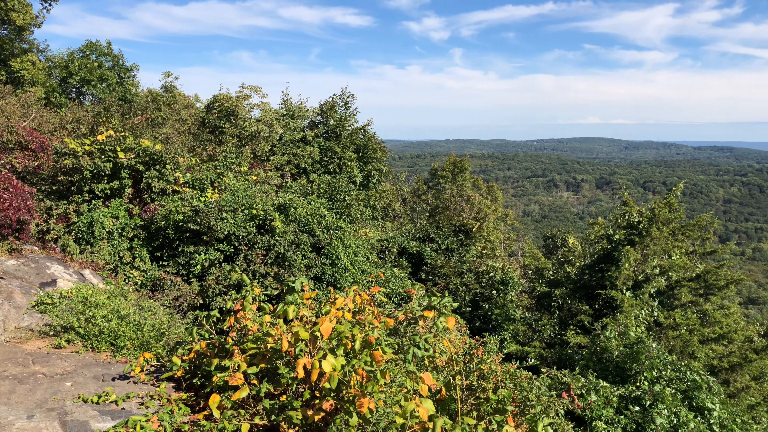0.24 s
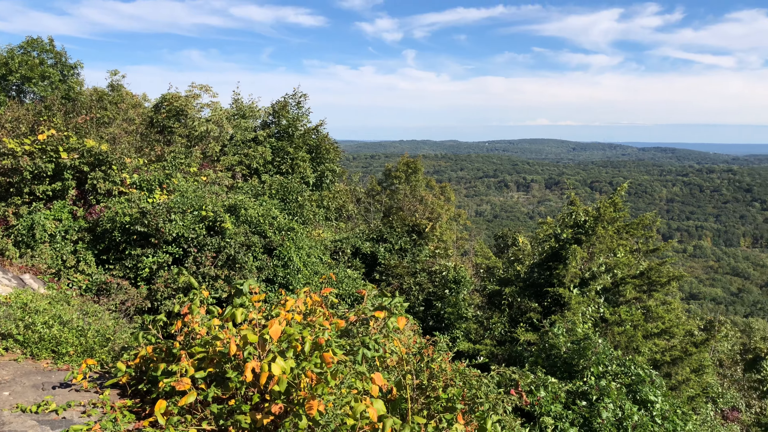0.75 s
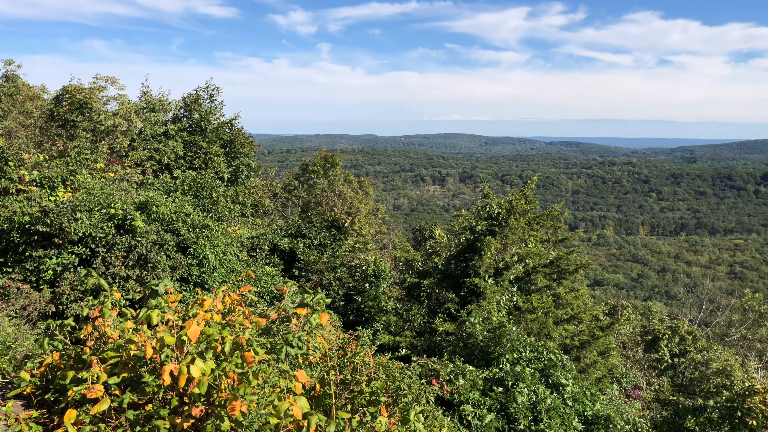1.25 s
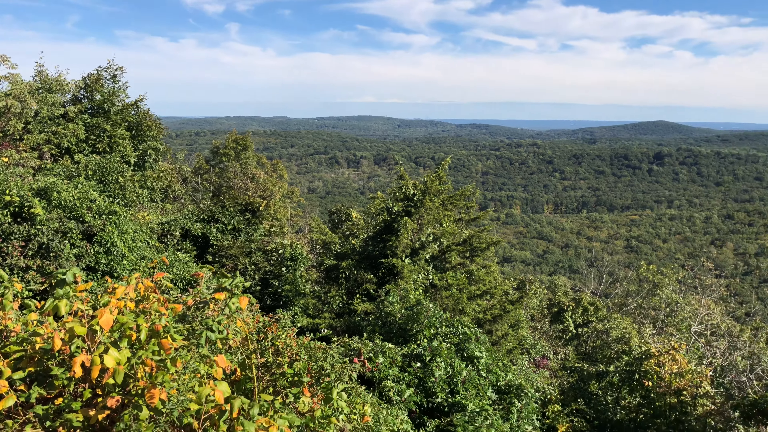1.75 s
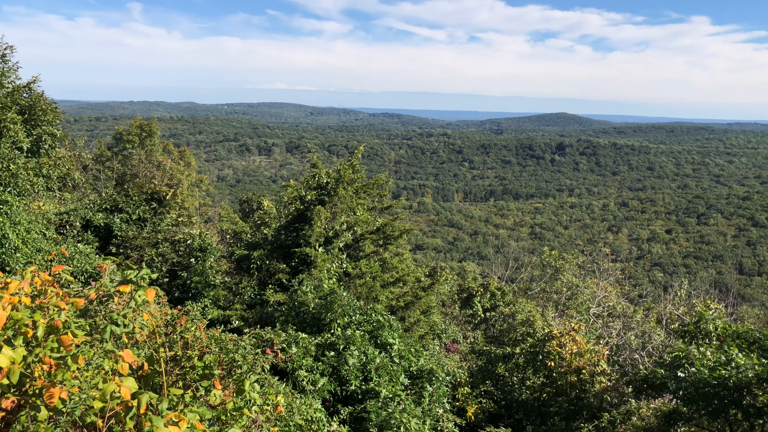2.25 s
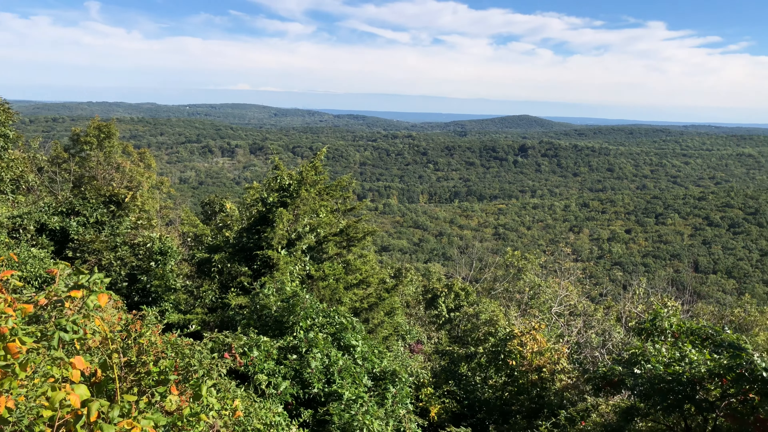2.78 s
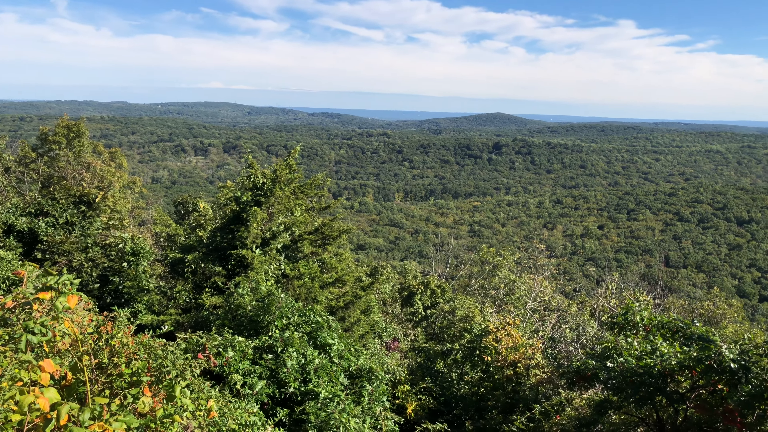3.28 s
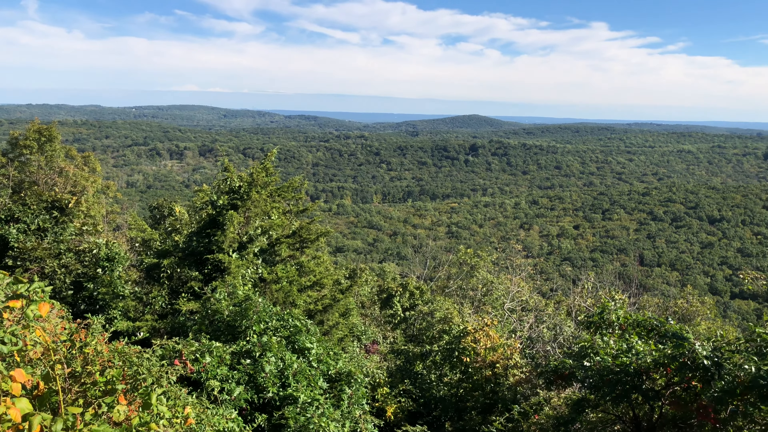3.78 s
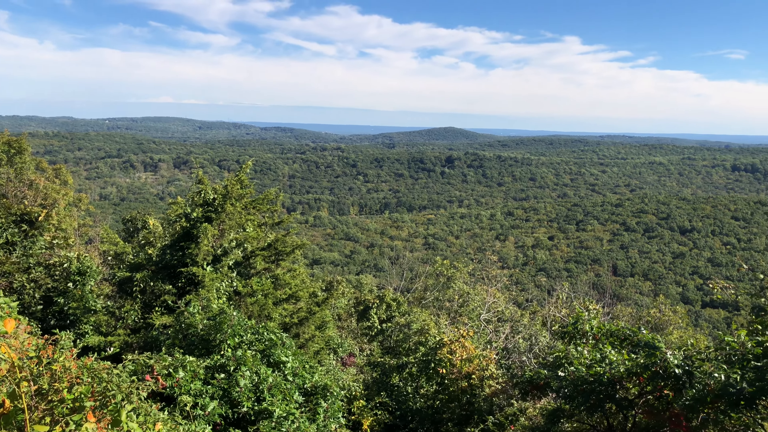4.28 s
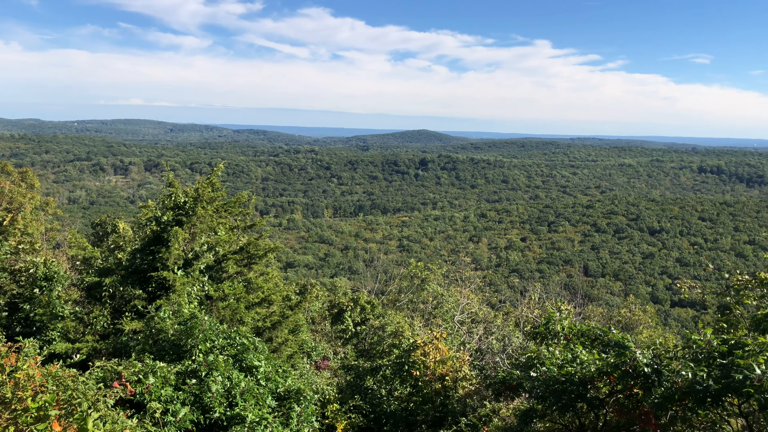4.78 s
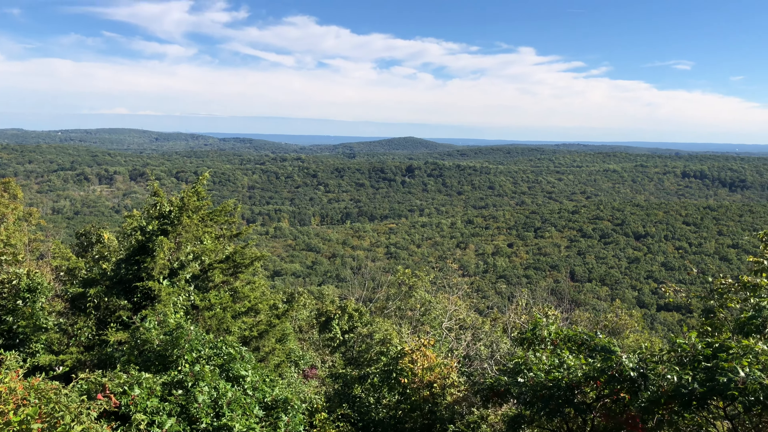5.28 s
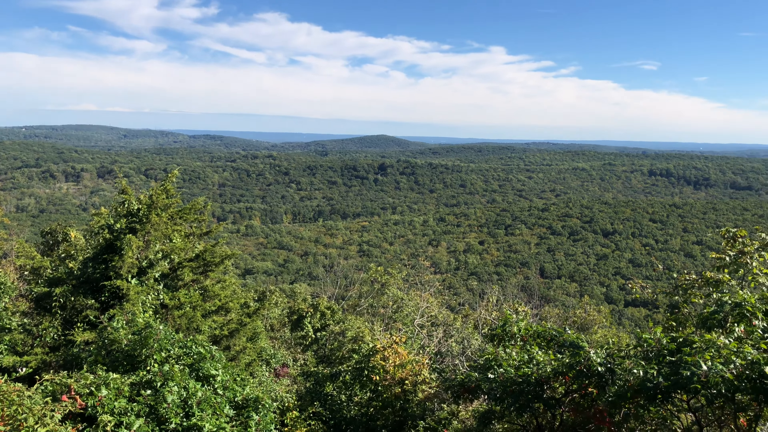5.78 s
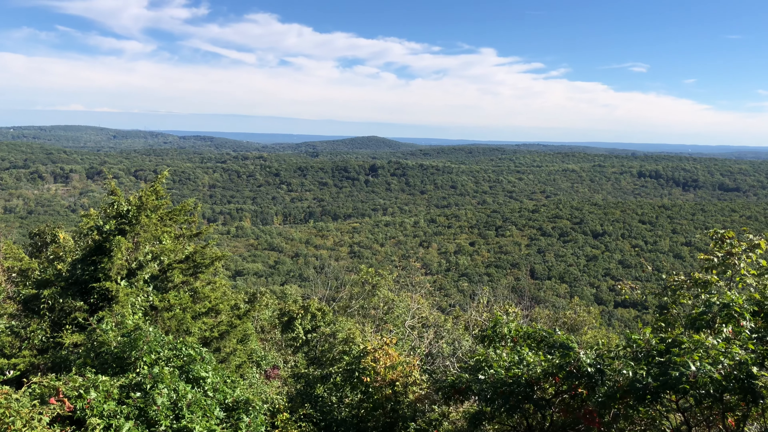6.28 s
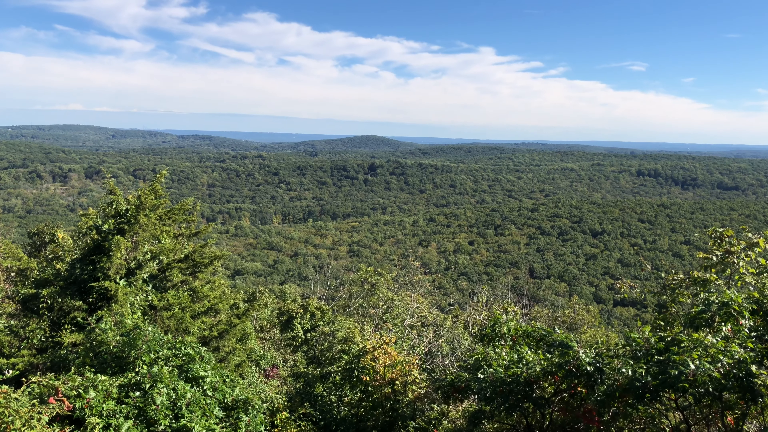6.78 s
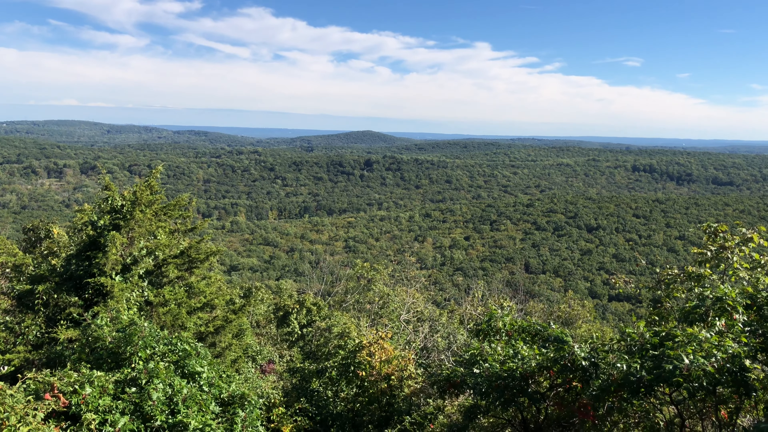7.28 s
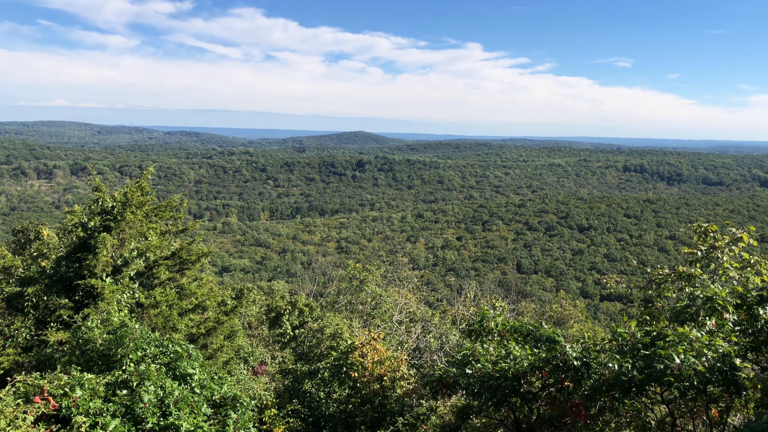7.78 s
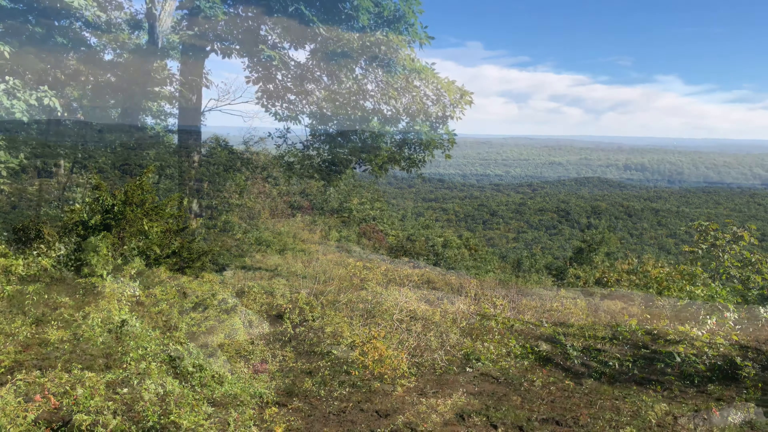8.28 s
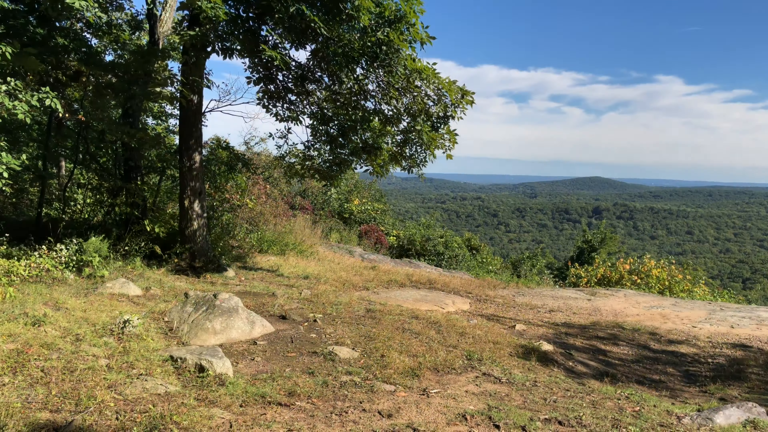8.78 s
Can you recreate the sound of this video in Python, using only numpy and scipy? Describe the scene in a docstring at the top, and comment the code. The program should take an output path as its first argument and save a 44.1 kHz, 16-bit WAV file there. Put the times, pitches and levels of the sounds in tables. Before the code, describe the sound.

A near cricket chirps about three times a second over high insect trills and light wind, with a raven croak and soft knocks.

```python
"""Insects on a wooded hilltop: a near cricket chirps with gliding tones, growing louder over the first seconds.
Farther crickets, high trills built of short tones and light wind made of noise last throughout the first spot.
Dry leaves tick there too, and a few soft knocks of fading noise come, mostly early on. A raven croaks at 2.7 s
(pulses and rasping air ring its throat); fainter calls follow from 4.8 s. In the last second the sound
dissolves to a second spot, where small ground crickets tinkle close by in arched notes."""
import sys
import numpy as np
from scipy import signal
from scipy.fft import rfft, irfft, next_fast_len
from scipy.io import wavfile
from scipy.ndimage import map_coordinates

SR = 44100
rng = np.random.default_rng(int(sys.argv[2]) if len(sys.argv) > 2 else 0)


def digitize_waveform(pressure):
    """Quantize a signal to 16-bit integers and store it at the path in sys.argv[1].

    Rows of a 2-D input are taken as channels; values are limited to [-1, 1].
    """
    field = np.atleast_2d(pressure).T
    bounded = np.clip(field, -1, 1)
    quanta = np.round(bounded * 32767).astype(np.int16)
    wavfile.write(sys.argv[1], SR, quanta)


N = 398663  # length of the sound in samples

# Chirps of the near cricket: (time mark [s], full strokes [count])
NEAR_CHIRPS = [(0.065, 3), (0.372, 3), (0.773, 3), (1.081, 3), (1.407, 3), (1.748, 3), (2.052, 3),
               (2.404, 3), (2.744, 3), (3.056, 3), (3.369, 3), (3.689, 3), (4.028, 3), (4.336, 3),
               (4.708, 2), (4.969, 3), (5.423, 3), (5.787, 3), (6.119, 3), (6.455, 3), (6.792, 3),
               (7.272, 3), (7.583, 3), (7.868, 3), (8.178, 3), (8.484, 3)]
# Pitch at even steps through a slow wing stroke, before small random changes: (pitch [Hz])
SLOW_STROKE_PITCH = [4808, 4832, 4881, 4802, 4610, 4020]
# The same for a quick wing stroke: (pitch [Hz])
QUICK_STROKE_PITCH = [5200, 4880, 4680, 4670, 4480, 4000]
# The same for the soft stroke that opens a chirp: (pitch [Hz])
OPENING_STROKE_PITCH = [5060, 4800, 4700, 4680, 4540, 4450]
# Usual sizes of the three full strokes, the middle one usually a little shorter; their random spread
STROKE_SIZES_S, STROKE_SCATTER_S = [.0158, .014, .0167], .002
# From one full stroke to the next; how far the soft opening stroke is ahead of the time mark
STROKE_GAP_S, LEAD_S = .0437, .0295
NEAR_DB, NEAR_RISE_DB, NEAR_RISE_S = -38.8, 12.5, 2.47  # the level after the rise; the rise itself

# Raven calls: (time [s], length before the pitch arch [s], level [dB], swell through the call [dB],
# throat pitch [factor], resonance width [factor])
RAVEN_CALLS = [(2.664, 0.23, -50, 5.5, 0.98, 0.84), (4.816, .15, -59.5, 2, 0.92, 2),
               (4.919, 0.042, -62.5, 4, 1.18, 2.7), (5.242, 0.048, -61.5, -10, 1.26, 3),
               (5.428, .04, -70, -0.5, 1.22, 2), (5.764, 0.028, -61, -4, 0.69, 2)]
# Throat resonances before those factors: (pitch [Hz], width [Hz], level [dB])
THROAT_RESONANCES = [(550, 72, -6.5), (800, 53, -13.5), (1085, 58, 3), (1234, 190, -7.5),
                     (1566, 130, -14.5), (1850, 150, -25), (2760, 250, -25), (3480, 400, -33)]

# Tinkling ground crickets: (first note [s], period [s], base pitch [Hz], note length [s], relative level [dB])
TINKLING_CRICKETS = [(8.160, .1075, 8050, .025, -50.5), (8.167, .1358, 7350, 0.028, -46.5),
                     (8.24, .158, 6060, .032, -61.5)]
# Pitch through a tinkling note: (share of the note [0 to 1], pitch [factor])
TINKLE_ARCH = [(0, 0.92), (.2, 0.96), (.4, 0.99), (.6, 0.99), (.8, .95), (1, 0.85)]

# Chirps that a few field crickets sing together at the second spot: (time [s])
GROUP_TIMES = [8.28, 8.82]
# Singers of that group: (lag [s], pitch [factor], level of the first stroke [dB])
GROUP_SINGERS = [(0, .96, -53), (.036, 0.96, -57), (.02, 0.98, -60)]
# Tone colour of the blurred crowd of field crickets: (pitch [Hz], level [dB])
FIELD_COLOUR = [(3600, -60), (4100, -8), (4350, 1.5), (4520, 3.5), (4800, 0), (5000, -22), (5500, -31)]
FIELD_DB = -64.5  # the whole distant crowd

# Trilling ground crickets: (average strokes per second [1/s], middle pitch [Hz], relative level [dB])
TRILLING_CRICKETS = [(69.3, 7600, -1.5), (98.5, 7600, -11), (64.2, 7150, -7), (32.43, 7650, -6),
                     (84.4, 7400, -2.5), (55.6, 7200, -2.5)]
# Tone colour of the crowd behind them: (pitch [Hz], level [dB])
TRILL_COLOUR = [(5500, -36), (6400, -15.5), (6750, -11), (7000, -4), (7280, 1), (7550, -1), (7800, -2),
                (8000, -13.5), (8200, -9.5), (8450, -22), (9500, -47)]
TRILL_DB = -55  # the whole chorus at the first spot

# Knocks: (time mark [s], relative thud level [dB], relative snap level [dB])
KNOCK_LIST = [(0.774, -60, -64), (0.999, -47.5, -66), (1.045, -50, -67), (1.854, -50, -70),
              (1.944, -50, -62.5), (2.172, -42.5, -70), (4.835, -46, -66)]
# Tone colour of the wooden thud: (pitch [Hz], level [dB])
THUD_COLOUR = [(100, -12), (250, 6.5), (450, 0.5), (750, -7), (1150, -4), (1700, -23), (4000, -48)]
# Tone colour of the thin snap: (pitch [Hz], level [dB])
SNAP_COLOUR = [(1000, 3), (2800, 11), (5000, -19), (11000, 3), (15000, -14)]
KNOCK_T60_S = .043  # time to die away by 60 dB

# Tone colour of a leaf tick: (pitch [Hz], level [dB])
TICK_COLOUR = [(2000, -8), (5000, -2), (11000, 0), (15000, -6)]
TICKS_PER_S, TICK_DB, TICK_SCATTER_DB, TICK_T60_S = 3, -66, 3, .03  # average level, its spread, 60 dB decay

# Tone colour of air on the microphone: (pitch [Hz], level [dB])
BUFFET_COLOUR = [(18, -33), (30, -22), (40, -8), (58, 1), (80, 0), (102, 0.5), (140, -5), (230, -30)]
# Tone colour of wind in far treetops: (pitch [Hz], level [dB])
RUSH_COLOUR = [(50, -30), (100, -8.5), (140, 2), (200, 0.5), (300, -3), (500, -7), (800, -12.5),
               (1200, -17.5), (2000, -24.5), (4000, -38.5)]
# Tone colour of hiss in the leaves: (pitch [Hz], level [dB])
HISS_COLOUR = [(500, -6.5), (1500, -0.5), (2000, -2), (3100, -0.5), (6000, 3), (9000, -2), (10500, -3.5),
               (12500, -11.5), (14300, -7.5), (15800, -13.5)]
BUFFET_DB, RUSH_DB, HISS_DB = -62.5, -58.7, -67  # light wind at the first spot, before gusts
# Gusts on the microphone: (start [s], hold [s], strength [dB])
GUST_LIST = [(-.4, 1.24, 3), (3.1, 1.68, 6.8), (5.65, .5, 2.5)]
GUST_ATTACK_S, GUST_RELEASE_S = .71, .3
RUSH_FOLLOWS = .12  # share of a gust's dB that the treetops take up

DISSOLVE_START_S, DISSOLVE_S = 7.91, .89  # cross-fade from the first spot to the second
TOP_HZ = 15800  # upper limit of the recorder


def amp(db):
    """Turn decibels into a plain multiplier."""
    return 10 ** (np.asarray(db) / 20)


def unit(x):
    """Scale a sound to an average strength (rms) of 1."""
    return x / np.sqrt(np.mean(x ** 2) + 1e-20)


def wobble(rate):
    """A smooth random curve with rate random points a second."""
    points = rng.standard_normal(int(N * rate / SR) + 4)
    return map_coordinates(points, [np.arange(N) * rate / SR])


def ramp(start, length):
    """0 before the start, rising evenly to 1 over a length in seconds."""
    return np.clip((np.arange(N) / SR - start) / length, 0, 1)


def progress(length):
    """0 to 1 over a length in seconds."""
    return np.linspace(0, 1, max(int(length * SR), 8))


def sweep(hz):
    """Add up a gliding pitch into the angle of a sine wave."""
    return 2 * np.pi * np.cumsum(hz) / SR


def filtered(x, response):
    """Make each frequency of x stronger or weaker, as response says."""
    m = next_fast_len(len(x) + SR // 4)
    return irfft(rfft(x, m) * response(np.fft.rfftfreq(m, 1 / SR)), m)[:len(x)]


def noise(spectrum, size=N):
    """Random noise of rms 1, coloured by a (pitch [Hz], level [dB]) table."""
    f, db = np.transpose(spectrum)

    def colour(hz):
        return amp(np.interp(np.log(hz + 1), np.log(f), db, left=-120, right=-120))

    return unit(filtered(rng.standard_normal(size), colour))


def add(track, s, sound):
    """Mix a sound into a track at time s, if it starts inside the track."""
    i = round(s * SR)
    if 0 <= i < N:
        track[i:i + len(sound)] += sound[:N - i]


def woods(x, wet_db, t60):
    """Trunks and leaves scatter a sound into a tail that dies by 60 dB in t60 seconds."""
    t = np.arange(SR) / SR
    tail = rng.standard_normal(SR) * amp(-60 * t / t60) * (1 - np.exp(-t / .0027))
    return x + amp(wet_db) * signal.fftconvolve(x, tail / np.linalg.norm(tail))[:N]


def near_cricket():
    """Each chirp is a short soft stroke, then two or three full ones; slow strokes arch, quick ones only fall."""
    chirps = np.zeros(N)
    for s, strokes in NEAR_CHIRPS:
        opening = wing_stroke(.0099, OPENING_STROKE_PITCH, overtone_db=-37)
        add(chirps, s - LEAD_S, amp(-5.0) * opening)
        for k, usual in enumerate(STROKE_SIZES_S[:round(strokes)]):
            size = usual + STROKE_SCATTER_S * rng.normal()
            slow = np.clip((size - .008) / .008, 0, 1)
            pitches = slow * np.array(SLOW_STROKE_PITCH) + (1 - slow) * np.array(QUICK_STROKE_PITCH)
            stroke = wing_stroke(size, pitches, overtone_db=-37)
            add(chirps, s + k * STROKE_GAP_S - .003, amp(.5 * (k - .5)) * stroke)
    level_db = NEAR_DB - NEAR_RISE_DB * (1 - ramp(0, NEAR_RISE_S))
    return woods(amp(level_db) * chirps, wet_db=-13, t60=.25)


def wing_stroke(size, pitches, overtone_db):
    """The scraper runs along the file and slows at the end, so the pitch drops."""
    u = progress(size * 1.4)  # room for a soft start and end
    tuning = 1 + rng.normal(0, .0062)
    phase = sweep(np.interp(u, np.linspace(0, 1, len(pitches)), pitches) * tuning)
    pressure = np.interp(u, [0, .12, .33, .57, .78, .88, 1], [0, .55, 1, 1, .62, .22, 0])
    teeth = 1 + .08 * map_coordinates(rng.standard_normal(12), [u * 11])  # slightly uneven loudness
    return pressure * teeth * (np.sin(phase) + amp(overtone_db) * np.sin(3 * phase))


def raven():
    """Slow uneven pulses and rasping air ring the throat, whose pitch arches; the valley answers."""
    calls = np.zeros(N)
    for s, length, db, swell_db, throat, breadth in RAVEN_CALLS:
        u = progress(length)
        unevenness = 1 + .12 * map_coordinates(rng.standard_normal(12), [u * 11])
        turns = np.cumsum(54 * unevenness) / SR + .6  # about 54 pulses a second
        pulses = np.diff(np.floor(turns), prepend=0)
        air = (np.exp(-(turns % 1) / .66) + .5) * rng.standard_normal(len(u))
        swell = amp(swell_db * u) * signal.windows.tukey(len(u), .12)
        flow = np.pad((unit(pulses) + 2 * unit(air)) * swell, (0, 600))  # room to ring on

        def resonances(f):
            total = 0
            for k, (centre, width, level_db) in enumerate(THROAT_RESONANCES):
                damping = 1j * f * width * breadth
                peak = damping / ((centre * throat) ** 2 - f * f + damping)
                total = total + (-1) ** k * amp(level_db) * peak
            return total

        # Reading the sound faster in the middle raises its pitch there.
        arch = .98 + .075 * np.sin(np.pi * np.linspace(0, 1, len(flow)))
        call = map_coordinates(filtered(flow, resonances), [np.cumsum(arch)])
        add(calls, s, amp(db) * unit(call))
    return woods(calls, wet_db=-7.5, t60=.85)


def tinklers():
    """Each ground cricket sings single notes, arched in pitch, at a steady beat."""
    notes = np.zeros(N)
    for first, period, hz, length, db in TINKLING_CRICKETS:
        u = progress(length)
        pressure = np.interp(u, [0, .12, .36, .62, .85, 1], [0, .4, 1, .8, .3, 0])
        pitch = hz * np.interp(u, *np.transpose(TINKLE_ARCH))
        note = pressure * np.sin(sweep(pitch))
        for s in np.arange(first, N / SR, period):
            add(notes, s, amp(db + 7) * note)
    return woods(notes, wet_db=-21.5, t60=.22)


def far_crickets():
    """Three higher singers, each fainter than the last and on its own beat, are smeared by the trees."""
    shrub = far_cricket(beat(first_s=-.04, period_s=.435, hurry_s=.0012, count=20),
                        pitch_hz=5166, rate=26, length=.02, glide=.026, warm_up=.01, count=6)
    tree = far_cricket(beat(first_s=.085, period_s=.3846, hurry_s=.0006, count=23),
                       pitch_hz=5415, rate=45, length=.014, glide=.01, warm_up=.013, count=8)
    crown = far_cricket(beat(first_s=.165, period_s=.3915, hurry_s=.0036, count=24),
                        pitch_hz=6190, rate=50, length=.015, glide=.022, warm_up=.035, count=8)
    return (amp(-61) * woods(shrub, wet_db=-3.5, t60=.3)
            + amp(-64.5) * woods(tree, wet_db=-1, t60=.43)
            + amp(-65.5) * woods(crown, wet_db=-1.5, t60=.4))


def far_cricket(starts, pitch_hz, rate, length, glide, warm_up, count):
    """Chirps of nearly even strokes that rise in pitch; the first strokes are softer and lower."""
    chirps, u = np.zeros(N), progress(length)
    for s in starts:
        effort_db = rng.normal(0, .62)
        for k in range(count):
            lag = np.exp(-k / 1.6)  # warming up: large at first, then fades
            hz = pitch_hz * (1 - warm_up * lag + glide * (u - .5) + rng.normal(0, .0055))
            start = s + k / rate + rng.normal(0, .002)
            level_db = effort_db - 2.8 * lag + rng.normal(0, 1.6)
            add(chirps, start, amp(level_db) * np.sin(np.pi * u) * np.sin(sweep(hz)))
    return chirps


def beat(first_s, period_s, hurry_s, count):
    """Chirp times at a nearly steady beat; pauses shrink by hurry_s each time, with small random shifts."""
    k = np.arange(count)
    return first_s + period_s * k - hurry_s * k ** 2 / 2 + rng.normal(0, .008, count)


def cricket_group():
    """A few field crickets chirp almost in step, so that their quick, swelling strokes overlap."""
    chirps = np.zeros(N)
    for s in GROUP_TIMES:
        for lag, pitch, db in GROUP_SINGERS:
            for k in range(4):
                stroke = wing_stroke(.0132, pitch * np.array(QUICK_STROKE_PITCH), overtone_db=-40)
                add(chirps, s + lag + k * STROKE_GAP_S, amp(db + 1.3 * k) * stroke)
    return woods(chirps, wet_db=-1.5, t60=.3)


def field_crickets():
    """Lower-pitched field crickets chirp out of step far away and blur together."""
    crowd = np.zeros(N)
    for s in np.arange(0, N / SR, 1 / 7):
        start = s + rng.uniform(-.07, .07)
        pitches = np.array(SLOW_STROKE_PITCH) * rng.uniform(.92, .98)
        for k in range(4):
            add(crowd, start + k * .043, wing_stroke(.016, pitches, overtone_db=-40))
    blurred = unit(woods(crowd, wet_db=-1.0, t60=.3))
    return amp(FIELD_DB) * unit(blurred + amp(-3) * noise(FIELD_COLOUR))


def trills(level_db):
    """A few ground crickets trill with falling notes at their own rates, in front of a crowd made of noise."""
    voices = np.zeros(N)
    for rate, hz, db in TRILLING_CRICKETS:
        turns = np.cumsum(rate * (1 + .012 * wobble(4))) / SR + rng.random()
        u = turns % 1  # place within each stroke
        stroke = np.exp(-((u - .5) / .18) ** 2)
        pitch = hz * (1 - .091 * (u - .5) + .022 * wobble(900))  # uneven teeth roughen the falling note
        voices += amp(db + 1.8 * wobble(40)) * stroke * np.sin(sweep(pitch))
    return amp(level_db) * unit(amp(-.5) * unit(voices) + noise(TRILL_COLOUR))


def knocks():
    """Soft wooden thuds, each with a thin snap: two noises that swell fast and die away together."""
    out, t = np.zeros(N), np.arange(SR // 8) / SR
    blow = (1 - np.exp(-t / .0029)) * amp(-60 * t / KNOCK_T60_S)
    for s, thud_db, snap_db in KNOCK_LIST:
        thud = amp(thud_db + 5.5) * noise(THUD_COLOUR, size=len(t))
        snap = amp(snap_db + 9.0) * noise(SNAP_COLOUR, size=len(t))
        add(out, s - .002, blow * (thud + snap))
    return out


def leaf_ticks():
    """Dry leaves touch nearby: faint, fast-dying bits of noise at random moments."""
    out, t = np.zeros(N), np.arange(SR // 16) / SR
    for s in rng.uniform(0, N / SR, round(TICKS_PER_S * N / SR)):
        level_db = TICK_DB + TICK_SCATTER_DB * rng.normal() - 60 * t / TICK_T60_S
        add(out, s, amp(level_db) * noise(TICK_COLOUR, size=len(t)))
    return out


def wind(buffet_db, rush_db, hiss_db):
    """Air buffets the microphone, rushes in far treetops and hisses in the leaves: three wavering noises."""
    buffet = amp(buffet_db + .7 * wobble(8.3)) * noise(BUFFET_COLOUR)
    rush = amp(rush_db + .69 * wobble(7)) * noise(RUSH_COLOUR)
    hiss = amp(hiss_db + .56 * wobble(6)) * noise(HISS_COLOUR)
    return buffet + rush + hiss


def gusts():
    """Each gust swells, holds and drops away (dB over the light wind)."""
    total_db = np.zeros(N)
    for s, hold, db in GUST_LIST:
        release_s = s + GUST_ATTACK_S + hold
        total_db += db * (ramp(s, GUST_ATTACK_S) - ramp(release_s, GUST_RELEASE_S))
    return total_db


def first_spot():
    """Above the shrubs: near cricket, farther singers, raven, knocks, leaf ticks and passing gusts."""
    insects = near_cricket() + field_crickets() + far_crickets() + trills(TRILL_DB)
    gust_db = gusts()
    air = wind(BUFFET_DB + gust_db, RUSH_DB + RUSH_FOLLOWS * gust_db, HISS_DB)
    return insects + raven() + knocks() + air + leaf_ticks()


def second_spot():
    """In the grass at the edge of the wood: close tinkling, a chirping group, softer trills, more leaf hiss."""
    insects = tinklers() + cricket_group() + trills(level_db=-57.5)
    return insects + wind(buffet_db=-62.0, rush_db=-60.5, hiss_db=-65.5)


def scene():
    """One microphone channel; the first spot dissolves into the second."""
    mix = ramp(DISSOLVE_START_S, DISSOLVE_S)
    return ((1 - mix) * first_spot() + mix * second_spot())[None]


def record(dry):
    """The recorder keeps nothing above its upper limit."""
    return np.array([filtered(x, lambda hz: hz < TOP_HZ) for x in dry])


dry = scene()
out = record(dry)
digitize_waveform(out)
```